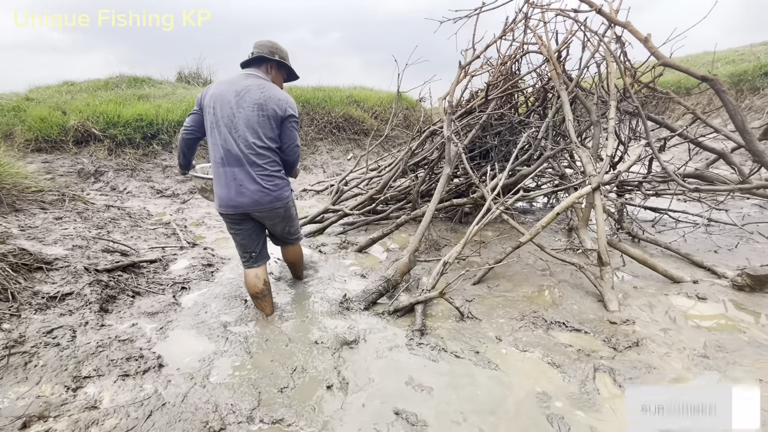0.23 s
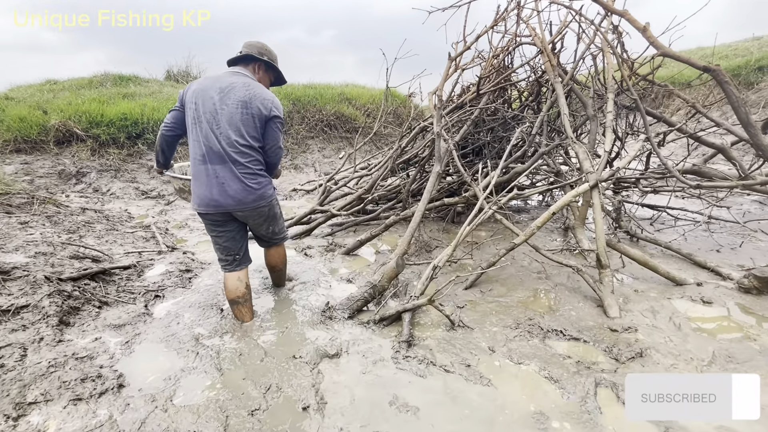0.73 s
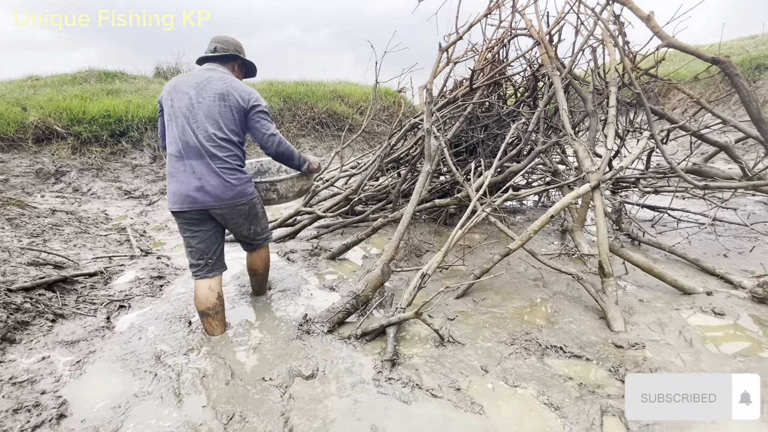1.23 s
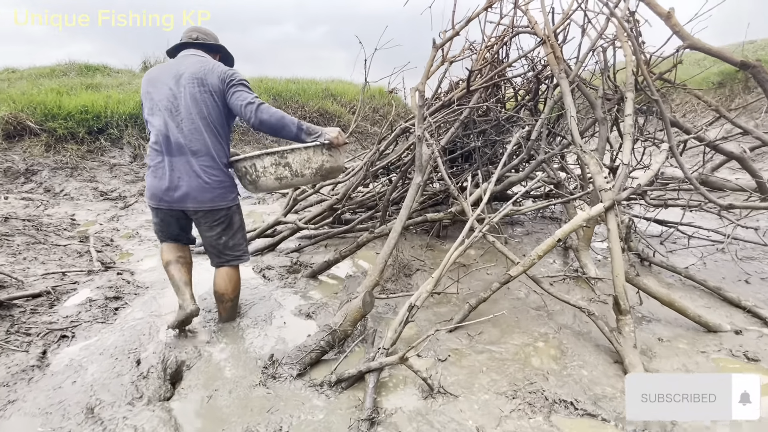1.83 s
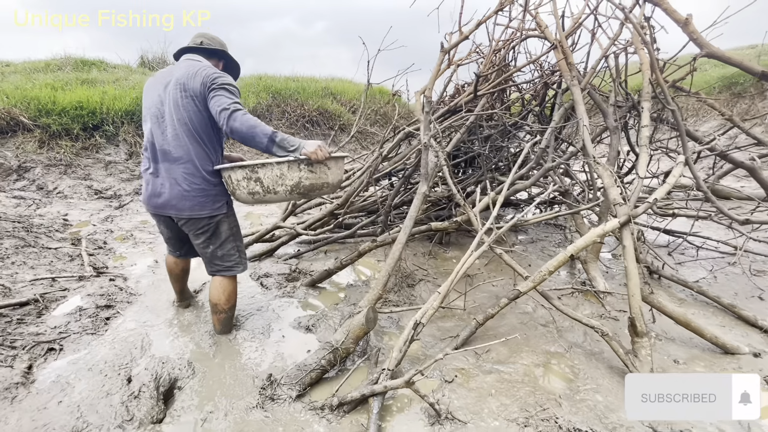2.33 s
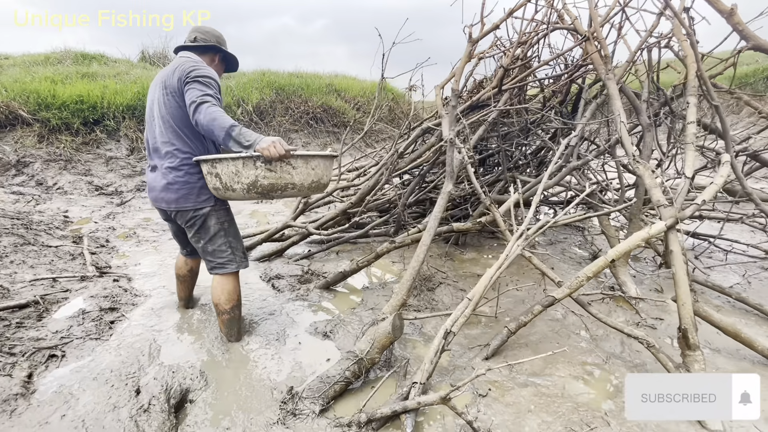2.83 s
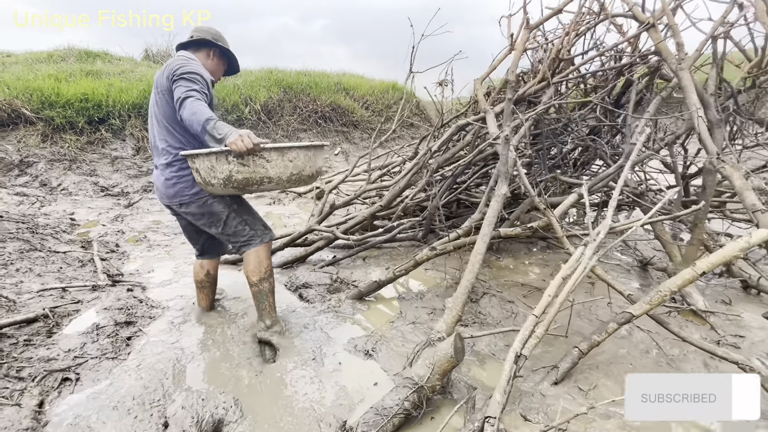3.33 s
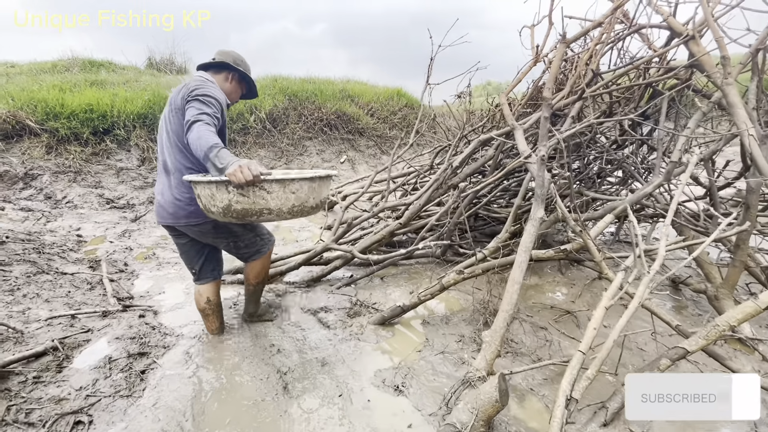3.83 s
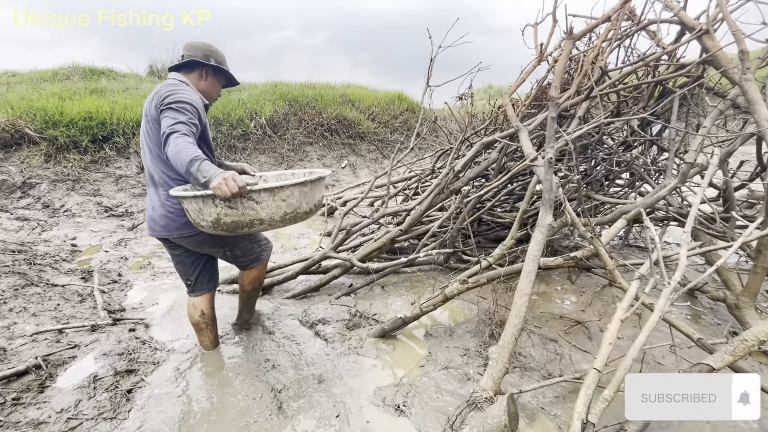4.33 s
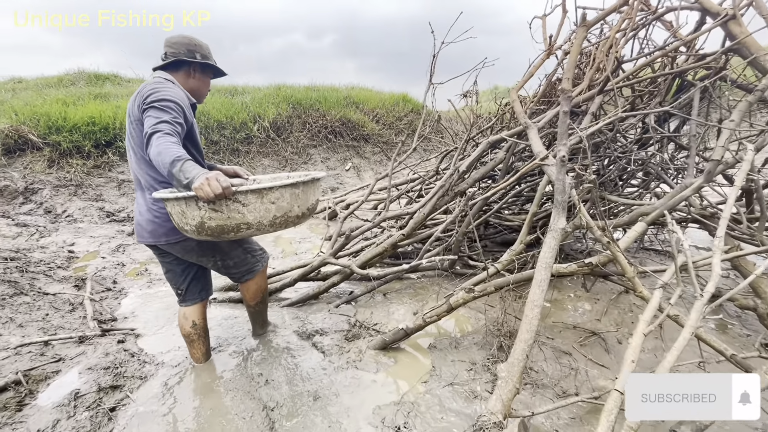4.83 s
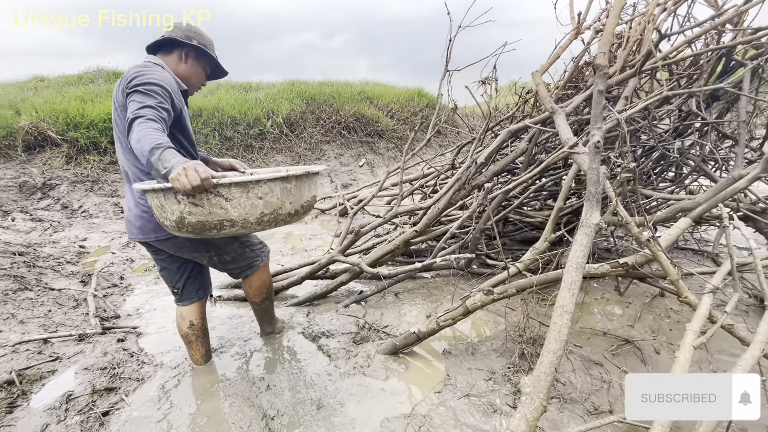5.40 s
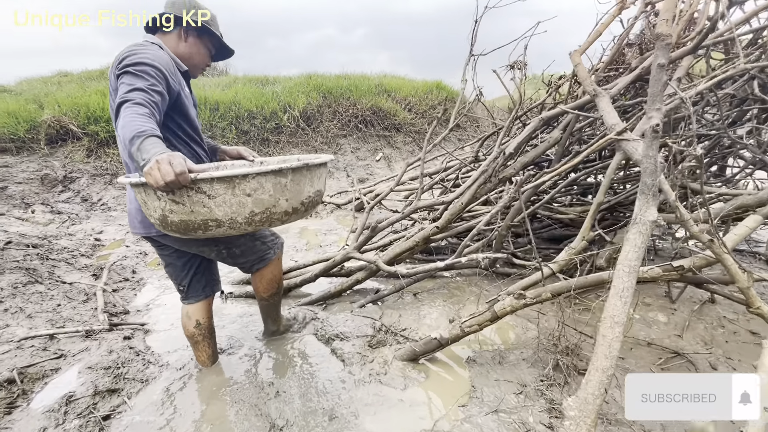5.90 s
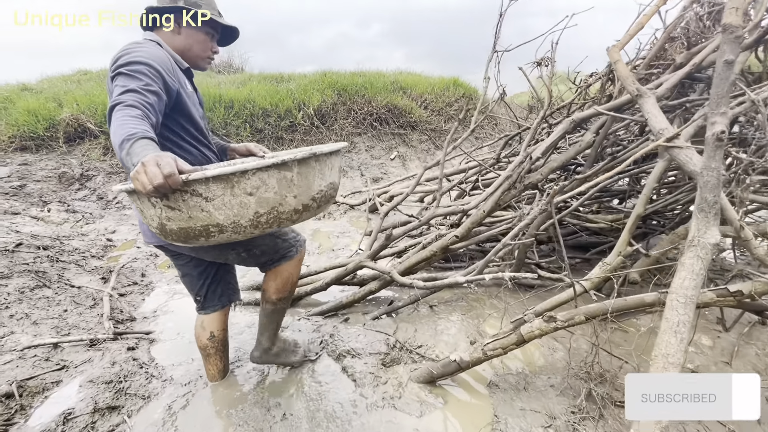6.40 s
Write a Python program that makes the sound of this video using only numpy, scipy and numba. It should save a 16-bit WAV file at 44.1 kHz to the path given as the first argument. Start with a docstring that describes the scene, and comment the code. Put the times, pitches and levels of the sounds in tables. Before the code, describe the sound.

Bare feet wade through wet mud, squelching, popping and splatting in uneven bursts, with fizzing water and a soft outdoor hiss.

```python
"""Bare feet wade through wet mud and puddles: air pockets pop as resonant bubbles with gliding, decaying tones.
Splats are showers of high-pitched droplets, thuds are low sagging notes, and gulps are gliding whistles.
Stirred water fizzes and gurgles as thousands of short bubble tones; grit scrapes ring a hollow body's few notes.
Filtered noise makes a soft outdoor hiss. All is heard close, in stereo, with level and time differences."""
import sys
import numpy as np
from scipy import signal
from scipy.fft import rfft, irfft, next_fast_len
from scipy.io import wavfile
from scipy.ndimage import uniform_filter1d
from numba import njit

SR = 44100
rng = np.random.default_rng(int(sys.argv[2]) if len(sys.argv) > 2 else 0)


def log_audio(samples):
    """Write samples as a 16-bit WAV file to the path given in sys.argv[1]."""
    # one column per channel
    frames = np.atleast_2d(samples).T
    # limit to full scale, then quantise
    limited = np.clip(frames, -1, 1)
    pcm = np.round(limited * 32767).astype(np.int16)
    wavfile.write(sys.argv[1], SR, pcm)


N = 293706


def undb(db):
    """Level to amplitude: 20 dB is a factor of ten."""
    return 10 ** (np.asarray(db) / 20)


def colour(x, points):
    """Linear filtering: weight the spectrum by (f/Hz, gain/dB) points joined along log frequency."""
    hz, db = np.transpose(points)
    size = next_fast_len(N)
    bins = np.maximum(np.fft.rfftfreq(size, 1 / SR), 1)
    gain = undb(np.interp(np.log(bins), np.log(hz), db))
    return irfft(rfft(x, size) * gain, size)[..., :N]


def walk(rate):
    """Slow random modulation: levels held 1 / rate s, then smoothed twice; spread near 1."""
    hold = int(SR / rate)
    steps = np.repeat(rng.standard_normal(N // hold + 1), hold)
    return 1.3 * uniform_filter1d(uniform_filter1d(steps, hold), hold)[:N]


@njit
def ring(s, hz, swell, fade, glide, left, right, lead, count, sr):
    """Transient resonance: gliding sines, 8 dB down swell s before and fade s after the peak; right lags by lead s."""
    out = np.zeros((2, count))
    for e in range(len(s)):
        for c in range(2):
            peak = (s[e] + c * lead[e]) * sr
            size = left[e] if c == 0 else right[e]
            first = max(int(peak - 2.2 * swell[e] * sr), 0)
            last = min(int(peak + 4 * fade[e] * sr), count)
            for i in range(first, last):
                t = (i - peak) / sr
                u = -t / swell[e] if t < 0 else t / fade[e]
                fall = u * u if t < 0 else u * np.sqrt(u)
                phase = 2 * np.pi * hz[e] * t * (1 + glide[e] * t / 2)
                out[c, i] += size * np.exp(-.92 * fall) * np.sin(phase)
    return out


def bubbles(s, db, hz, swell, fade, pan_db, octaves, lead_ms):
    """Bubble resonance: each air pocket rings, its pitch moving by about octaves over swell plus fade."""
    one = np.ones(len(s))
    glide = np.log(2) * octaves / (swell + fade)
    left, right = undb(db + pan_db / 2) * one, undb(db - pan_db / 2) * one
    return ring(s, hz, swell, fade, glide, left, right, lead_ms / 1000 * one, N, float(SR))


def droplets(s, db, centre_hz, pan_db, spread, turns, scatter_db, lead_ms, wander_ms, low_hz=40):
    """Superposition of tiny bubbles, random in pitch, level and place, fading 8 dB in turns cycles."""
    pitch, size, place, side = rng.standard_normal((len(s), 4)).T
    hz = np.clip(centre_hz * 2 ** (spread * pitch), low_hz, 15000)
    swell, fade, octaves = .4 * turns / hz, turns / hz, .06
    level_db = db + scatter_db * np.abs(size)
    return bubbles(s, level_db, hz, swell, fade, pan_db + 0.5 * side, octaves, lead_ms + wander_ms * place)


def shower(s, swell, fade, count):
    """Random arrivals round each peak: droplet times, and levels falling 7 dB per swell or fade time."""
    s, swell, fade = (np.repeat(c, count) for c in (s, swell, fade))
    where = 5.5 * rng.random(len(s)) - 1.5  # in swell times before the peak, fade times after it
    return s + where * np.where(where < 0, swell, fade), -7 * np.abs(where)


# chosen spectrum for the soft hiss, with almost nothing above 13 kHz: (f/Hz, relative level/dB)
HISS_SPECTRUM = [(30, -29), (70, 0), (250, -1.5), (550, 8.5), (3000, -10), (11500, -19.5), (13000, -43)]
HISS_DB = -74.5  # level before the swell and the overall tone


def air():
    """Partial coherence: a shared hiss plus independent noise in each channel, swelling a little."""
    shared, left, right = colour(rng.standard_normal((3, N)), HISS_SPECTRUM)
    hiss = np.array([left, right]) + 1.73 * shared
    swell_db = np.array([[1.5], [-1.5]]) + walk(3)
    return hiss * undb(HISS_DB + swell_db) / np.std(hiss)


# water draining and stirring round the legs, before each layer's share: (t/s, fizz level/dB, gurgle level/dB)
STIRRING = [(0.0, -36, -55.5), (0.12, -47, -59.5), (0.33, -44, -61.5), (0.48, -55, -73),
            (0.82, -57.5, -70.5), (1.01, -50, -62), (1.5, -49, -62.5), (1.56, -47, -39), (1.64, -35, -44),
            (1.68, -48, -56), (1.85, -45, -49.5), (2.2, -42.5, -59.5), (2.26, -33, -61), (2.42, -39.5, -52),
            (2.67, -55, -61.5), (3.15, -53, -71.5), (3.55, -43, -53), (3.65, -42, -51.5),
            (3.97, -38, -43.5), (4.09, -39.5, -49), (4.25, -48, -52), (4.47, -57, -87),
            (4.65, -52.5, -66.5), (4.76, -59, -77.5), (5.28, -55, -95), (5.67, -54.5, -72),
            (5.73, -47.5, -60.5), (5.95, -54.5, -57), (6.35, -47.5, -52.5), (6.49, -47, -59),
            (6.66, -45, -55)]
# pitch of the gurgle as the hollow round the leg opens and fills: (t/s, f/Hz)
GURGLE_PITCH = [(0, 659), (1.5, 532), (1.74, 540), (1.79, 770), (1.88, 940), (1.93, 648), (2.4, 750),
                (2.5, 1066), (2.7, 917), (3.2, 574), (3.953, 550), (4.031, 850), (4.5, 766), (5.7, 600),
                (6.0, 723), (6.66, 662)]
# wakes left by events: drive relative to the event in dB, time to fall 8.7 dB in s
FIZZ_WAKE_DB, FIZZ_WAKE_S = 3.5, 0.008
GURGLE_WAKE_DB, GURGLE_WAKE_S = -14.5, 0.012
WAKE_RISE_S = 0.0047


def slosh():
    """Entrained-air noise: fizz, crackle, plips, gurgle and dull rumble follow the stirring in uneven spurts."""
    _, fizz_db, slow_gurgle_db = np.transpose(STIRRING)
    sprays = [(s, db + 10 * np.log10(spread)) for s, db, _, _, spread in SPLAT_EVENTS]  # wide splats fizz more
    fizz_db = stirred(fizz_db, sprays, FIZZ_WAKE_DB, FIZZ_WAKE_S)
    gurgle_db = stirred(slow_gurgle_db, POP_EVENTS, GURGLE_WAKE_DB, GURGLE_WAKE_S)
    thud_wake_db = stirred(slow_gurgle_db, THUD_EVENTS, GURGLE_WAKE_DB, GURGLE_WAKE_S)
    both_db = (gurgle_db + fizz_db) / 2
    rumble_db = 0.52 * thud_wake_db  # flatter dynamics
    hollow_hz = np.interp(np.arange(N) / SR, *np.transpose(GURGLE_PITCH))
    fizz_turns, plip_turns, gurgle_turns = 6.5, 3., 5.
    # droplets, level/dB, centre f/Hz, spread/octaves, fade/cycles, size scatter/dB, share/dB
    layers = [
        (32000, fizz_db, 7805.0, 0.693, fizz_turns, 1.37, -19.5),  # fine fizz
        (300, both_db, 1940.0, 0.606, plip_turns, 1.4, -4.5),  # lone plips
        (400, fizz_db, 11670.0, 0.37, plip_turns, 2.7, -7.0),  # high plips
        (1500, gurgle_db, hollow_hz, 0.286, gurgle_turns, 1.5, -9.0),  # gurgle
        (3000, gurgle_db, 1.551 * hollow_hz, 0.413, gurgle_turns, 1.87, -6.5),  # upper gurgle
        (12000, both_db, 2456.0, 0.466, fizz_turns, 0.63, -16.5),  # crackle
        (1500, rumble_db, 220.0, 0.85, 0.99, 0.45, -35.5),  # dull rumble
    ]
    out = 0
    for count, curve_db, hz, spread, turns, scatter_db, share_db in layers:
        s = rng.random(count) * N / SR
        at = (s * SR).astype(int)
        db = (curve_db + 3 * walk(25))[at] + share_db
        centre_hz = (hz * np.ones(N))[at]
        out = out + droplets(s, db, centre_hz, 7.16, spread, turns, scatter_db, 0.4284, 0.12)
    return out


def stirred(curve_db, events, wake_db, wake_s):
    """Energy addition: slow stirring power plus each event's decaying wake, as a level in dB per sample."""
    t = np.arange(N) / SR
    kicks = np.zeros(N)
    s, db = np.transpose(events)[:2]
    np.add.at(kicks, ((s + WAKE_RISE_S / 2) * SR).astype(int), undb(db + wake_db) ** 2)
    drive = uniform_filter1d(kicks, int(WAKE_RISE_S * SR))
    wake = signal.lfilter([1], [1, -np.exp(-2 / (wake_s * SR))], drive)
    slow = undb(np.interp(t, np.transpose(STIRRING)[0], curve_db)) ** 2
    return 10 * np.log10(slow + wake)


# jerks of a gritty scrape on something hollow: (peak t/s, level/dB before the note levels)
SCRAPE_JERKS = [(5.016, -55), (5.05, -54), (5.358, -46), (5.381, -42), (5.701, -45), (5.723, -44),
                (5.75, -52)]
# the hollow's resonances: (f/Hz, relative level/dB)
HOLLOW_NOTES = [(2500, -18), (3450, 2), (4600, -19.5), (5350, -0.5), (6210, -5.5)]
JERK_SWELL_S, JERK_FADE_S = 0.0023, 0.0088  # 7 dB times


def scrapes(count=110):
    """Modal excitation: dense grit impacts set the hollow's few notes ringing."""
    s, db = np.transpose(SCRAPE_JERKS)
    late, under_db = shower(s, JERK_SWELL_S + 0 * s, JERK_FADE_S + 0 * s, count=count)
    notes = rng.integers(len(HOLLOW_NOTES), size=len(late))
    hz, note_db = np.array(HOLLOW_NOTES)[notes].T
    spread, turns = .07, 12.  # octaves, cycles
    grain_db = np.repeat(db, count) + under_db + note_db - 9
    return droplets(late, grain_db, hz, 8.1, spread, turns, 0.69, 0.51, 0.12)


# closing footprints squeeze their air:
# (t/s, length/s, start f/Hz, end f/Hz, level/dB before flutter, left minus right level/dB)
GULP_EVENTS = [(1.779, 0.032, 742, 990, -47, 1), (3.7, 0.15, 445, 695, -51.5, 10),
               (3.77, 0.053, 559, 400, -48, 7), (4.623, 0.04, 520, 900, -51.5, -6),
               (4.656, 0.026, 980, 1600, -54.5, -2), (5.943, 0.04, 797, 2200, -56.5, -5)]


def gulps():
    """Frequency modulation: a squeezed pocket whistles unsteadily and glides faster towards its end."""
    out = np.zeros((2, N))
    flutter = undb(3.2 * walk(130))
    for s, length, from_hz, to_hz, db, pan_db in GULP_EVENTS:
        part = np.linspace(0, 1, int(length * SR))
        hz = from_hz * (to_hz / from_hz) ** part ** 1.3
        tone = np.sin(2 * np.pi * np.cumsum(hz) / SR)
        shape = np.minimum(part / .06, 1) * np.minimum((1 - part) / .5, 1)
        sides = undb(db + np.array([[pan_db], [-pan_db]]) / 2)
        start = int(s * SR)
        out[:, start:start + len(part)] += sides * shape * tone
    return out * flutter


# soles and heels sinking into the mud: (peak t/s, peak level/dB, f/Hz)
THUD_EVENTS = [(0.151, -55, 57), (0.439, -52.5, 70), (0.742, -51, 104), (1.029, -52.5, 225),
               (1.248, -52, 63), (1.338, -51, 84), (1.553, -37, 98), (1.792, -47, 256), (3.22, -51, 89),
               (3.468, -32, 174), (3.487, -38, 95), (3.985, -45, 99), (5.129, -56, 272), (5.425, -40, 233),
               (5.61, -54, 253), (5.785, -35, 258), (5.971, -42, 246), (6.059, -45, 260),
               (6.118, -39.5, 216), (6.283, -38.5, 240), (6.413, -35, 233), (6.551, -33, 174),
               (6.571, -34, 92)]
THUD_CYCLES = 0.68  # from peak to 8 dB down
THUD_SAG = -.25  # octaves


def thuds():
    """Heavily damped resonance: the mud gives under the sole in a low note that sags."""
    s, db, hz = np.transpose(THUD_EVENTS)
    fade = THUD_CYCLES / hz
    return bubbles(s, db, hz, 1.28 * fade, fade, 4.1, THUD_SAG, 0.41)


# thrown water and mud: (peak t/s, nominal level/dB, centre f/Hz, 7 dB fade/ms, pitch spread/octaves)
SPLAT_EVENTS = [(0.019, -37, 8900, 11.2, 0.93), (0.258, -43, 5750, 5, 0.49),
                (0.3104, -33, 8140, 10.5, 0.53), (0.403, -46.5, 3970, 5.3, 1.05),
                (0.54, -52.5, 5360, 3.5, 1.15), (0.649, -49.5, 3000, 4.3, 0.65),
                (0.681, -45.5, 5400, 6.7, 0.17), (0.754, -48, 5960, 4, 0.17),
                (1.534, -35, 6130, 11.1, 0.44), (1.592, -29.5, 2620, 12.5, 0.071),
                (1.6108, -29.5, 4200, 3.5, 0.27), (1.626, -40, 6550, 21, 0.32),
                (1.7177, -35.5, 10000, 16.4, 0.5), (1.701, -43.5, 4970, 19, 0.5),
                (1.749, -34.5, 7350, 4, 0.45), (1.9113, -36, 7100, 25, 0.44),
                (1.9546, -28.5, 9400, 5.5, 1.32), (2.214, -17.5, 7170, 1.83, 0.12),
                (2.232, -25.5, 8200, 1.6, 0.27), (2.249, -30, 4500, 3, 1.15),
                (2.3906, -33.5, 10500, 7.7, 0.14), (2.426, -33, 9350, 5.1, 0.84),
                (2.607, -31.5, 7900, 2.7, 0.11), (2.727, -43, 4540, 1.6, 0.16),
                (2.74, -52.5, 4800, 1.4, 0.3), (2.8996, -39, 8650, 3.9, 0.13),
                (3.085, -36.5, 4500, 1.96, 0.24), (3.203, -43, 7950, 1.7, 0.58),
                (3.3172, -43, 3540, 4.8, 0.51), (3.447, -33.5, 3050, 7, 0.58),
                (3.4636, -29, 9900, 4.9, 0.92), (3.484, -27.5, 8440, 4.3, 0.6),
                (3.619, -36.5, 5800, 1.8, 0.38), (3.65, -27, 11100, 2.3, 0.14),
                (3.693, -34.5, 7800, 2, 0.47), (3.837, -27, 6730, 5.1, 0.13),
                (3.98, -16.5, 11300, 1.16, 0.25), (4.007, -31.5, 5740, 5.1, 0.59),
                (4.234, -37.5, 8640, 3.2, 0.2), (4.336, -40.5, 7250, 1.2, 0.25),
                (4.538, -45, 7530, 6.9, 0.31), (4.566, -41.5, 10760, 5.6, 0.23),
                (4.602, -27.5, 6050, 5.6, 0.11), (4.656, -40, 5320, 2.5, 0.083),
                (4.79, -42, 5180, 1.8, 0.1), (5.02, -51, 4290, 26.6, 0.52), (5.083, -38, 8850, 2.5, 0.12),
                (5.231, -44.5, 5500, 3.5, 0.067), (5.327, -53.5, 5850, 13.7, 0.79),
                (5.372, -46.5, 6550, 17.4, 0.8), (5.6046, -45.5, 5930, 4, 0.84),
                (5.701, -47.5, 6160, 13.4, 1.03), (5.75, -39.5, 6700, 4, 0.35),
                (5.805, -51, 5200, 4.4, 1.11), (5.994, -37.5, 6070, 0.81, 0.15),
                (5.78, -28.5, 9100, 3.2, 0.093), (6.1343, -47, 3460, 6.5, 1.08),
                (6.349, -41.5, 5400, 8.3, 0.77), (6.402, -33.5, 6400, 7.5, 0.78),
                (6.418, -32.5, 4900, 5.9, 0.13), (6.605, -22, 12740, 8.8, 0.11),
                (6.6193, -27.5, 2940, 2.4, 0.96)]
SPLAT_SWELL = 0.35  # swell time as a share of the fade


def splats(count=90):
    """Superposition of droplet impacts: each splat is a shower that swells, then dies away."""
    s, db, hz, fade_ms, spread = np.transpose(SPLAT_EVENTS)
    late, under_db = shower(s, SPLAT_SWELL * fade_ms / 1000, fade_ms / 1000, count=count)
    # a longer or wider shower spreads its droplets thinner, so each must be larger
    db = db + 10 * np.log10(fade_ms * spread / 2.93)
    db, hz, spread = (np.repeat(c, count) for c in (db, hz, spread))
    turns = 5.5  # cycles
    return droplets(late, db + under_db - 13.0, hz, 12.6, spread, turns, 0.16, 0.485, 0.03)


# air pockets bursting in the mud: (peak t/s, peak level/dB, f/Hz, 8 dB fade/ms)
POP_EVENTS = [(0.214, -46.5, 470, 2.5), (0.302, -45, 1750, 2), (0.31, -48, 2300, 3.7),
              (0.323, -49, 2370, 5.4), (0.4025, -44.5, 540, 1.2), (0.468, -48, 1580, 3.5),
              (0.618, -45, 400, 1.3), (0.715, -45, 490, 1.66), (1.4813, -42, 426, 1.45),
              (1.5264, -23.5, 1450, 3.4), (1.53, -31.5, 604, 7.4), (1.535, -26.5, 1350, 2.5),
              (1.554, -35, 945, 6.6), (1.571, -30.5, 576, 3.5), (1.5975, -25.5, 544, 2.6),
              (1.6115, -16, 990, 2.6), (1.619, -28.5, 1580, 11), (1.619, -16, 504, 5.7),
              (1.696, -25, 1610, 5.3), (1.702, -41, 2390, 3.8), (1.7127, -25.5, 1150, 3.7),
              (1.7241, -33.5, 574, 8.9), (1.7351, -36.5, 600, 4.9), (1.7782, -38, 714, 2.8),
              (1.811, -37, 880, 4.2), (1.8425, -38.5, 1060, 2.9), (1.851, -39, 880, 2.4),
              (1.866, -45, 990, 1.4), (1.874, -36, 890, 1.4), (1.9103, -25.5, 1740, 3.6),
              (1.913, -39.5, 627, 5), (1.956, -32.5, 2360, 1.1), (1.956, -26.5, 1426, 4.8),
              (1.978, -38, 2110, 3.5), (1.994, -39, 1930, 1.6), (2.233, -22.5, 1400, 0.58),
              (2.244, -39, 2640, 3.8), (2.309, -29, 2110, 0.59), (2.318, -43.5, 1190, 5.2),
              (2.461, -46, 1440, 0.63), (2.505, -31, 1510, 1.4), (2.476, -35, 1800, 1.03),
              (2.51, -40, 1910, 3.3), (2.5153, -41, 720, 3.5), (2.5262, -21.5, 1540, 1.66),
              (2.5631, -31, 1550, 2.3), (2.599, -64, 2450, 0.92), (2.6107, -41, 1860, 1.9),
              (2.62, -37, 2280, 0.32), (2.6344, -42, 1690, 1.3), (2.652, -49, 626, 2.3),
              (2.699, -46, 2450, 1.5), (2.711, -33.5, 1500, 1.7), (2.716, -32.5, 1700, 2.4),
              (2.728, -52, 905, 1.9), (2.7926, -39.5, 2400, 1.3), (2.901, -40.5, 2060, 1.33),
              (3.1806, -42, 1900, 0.52), (3.203, -26.5, 614, 2.44), (3.313, -41, 504, 5.7),
              (3.3651, -30.5, 1390, 2.8), (3.4475, -28, 544, 1.9), (3.4483, -36, 1700, 4.1),
              (3.4577, -30.5, 590, 3.5), (3.4638, -26.5, 1240, 2), (3.51, -37, 1180, 0.27),
              (3.58, -40.5, 1700, 3), (3.645, -39, 1200, 3.3), (3.657, -35, 1050, 2.8),
              (3.676, -42, 1090, 4), (3.685, -40, 1780, 2.5), (3.6529, -31.5, 470, 2.8),
              (3.662, -31.5, 1740, 2.2), (3.6947, -34.5, 1730, 1.6), (3.762, -43, 1110, 4.5),
              (3.799, -39.5, 468, 5.7), (3.8422, -39, 935, 8.4), (3.8798, -37.5, 564, 8.2),
              (3.881, -35.5, 1090, 4.2), (3.9727, -18, 1130, 0.74), (3.939, -39, 1050, 4),
              (3.9927, -26, 2240, 0.49), (4.012, -38.5, 1090, 11), (4.058, -39.5, 950, 5.1),
              (4.235, -43, 2720, 3), (5.219, -51, 1170, 2.3), (5.5222, -37, 2120, 5.6),
              (5.5321, -54, 640, 3.7), (5.651, -52.5, 1500, 2.9), (5.699, -43, 600, 5.9),
              (6.035, -42, 1670, 3.4), (6.086, -45, 3000, 9), (6.137, -35.5, 580, 3.44),
              (6.2203, -47, 620, 3), (6.283, -49, 2450, 5.3), (6.253, -39.5, 610, 3.2),
              (6.2946, -31.5, 615, 3.35), (6.306, -56, 1820, 1.7), (6.352, -51, 3330, 4.5),
              (6.384, -41, 2050, 4.5), (6.4, -33.5, 716, 2.7), (6.36, -37, 480, 4.1),
              (6.398, -36, 1560, 1.64), (6.481, -41.5, 490, 3.6), (6.533, -43, 610, 2.5),
              (6.5438, -23, 695, 1.14), (6.555, -37.5, 1500, 1.9), (6.5552, -33.5, 790, 2.9),
              (6.597, -30, 1450, 1.75), (6.6258, -28.5, 1210, 1.26)]
# where the working foot stands: (t/s, left minus right level/dB, left lead/ms)
FOOT_PLACE = [(0, 8.5, 0.39), (1.7, 6.5, 0.35), (1.8, -1, -0.054), (1.96, 4.5, 0.423), (2.25, 5.5, 0.091),
              (2.8, 3, 0.064), (3.198, 10.5, 0.36), (4.3, 3.5, 0.25), (5.699, 7.5, 0.216), (6.1, 6, 0.19),
              (6.36, 3.5, -0.27), (6.66, 3, 0.34)]
POP_RISE = 0.28  # octaves per kHz of pitch for quick pops: small pockets chirp more
POP_QUICK_MS = 2.2  # pockets that ring longer than this hold their pitch better


def pops(count=28):
    """Bubble resonance: each pocket rings once, rising as it opens; mud tearing round it adds small neighbours."""
    s, db, hz, fade_ms = np.transpose(POP_EVENTS)
    when, foot_db, foot_ms = np.transpose(FOOT_PLACE)
    pan_db, lead_ms = np.interp(s, when, foot_db), np.interp(s, when, foot_ms)
    fade = fade_ms / 1000
    rise = POP_RISE * hz / 1000 * np.minimum(POP_QUICK_MS / fade_ms, 1) ** 2
    pockets = bubbles(s, db, hz, 0.29 * fade, fade, pan_db, rise, lead_ms)
    late, under_db = shower(s, 0.932 * fade, 2.3 * fade, count=count)
    db_n, hz_n, pan_n, lead_n = (np.repeat(c, count) for c in (db, hz, pan_db, lead_ms))
    turns, scatter_db, spread, share_db = 2.6, 2.5, .36, -16.5
    tear_db = db_n + under_db + share_db
    tearing = droplets(late, tear_db, 1.071 * hz_n, pan_n, spread, turns, scatter_db, lead_n, 0.19, low_hz=447)
    return pockets + tearing


def scene():
    """Linear superposition of all sources, from background to main source."""
    return air() + slosh() + scrapes() + gulps() + thuds() + splats() + pops()


# tonal tilt between the channels: (f/Hz, left minus right level/dB)
STEREO_TILT = [(60, 0), (400, -1.5), (2500, -4.5), (3400, -2.5), (6700, -0.5), (8500, -3), (15000, -10.5)]
# overall tone, a bright rise to 11.5 kHz, then a steep drop above 12.6 kHz: (f/Hz, gain/dB)
OVERALL_TONE = [(30, 2), (100, -1.5), (11500, 9.5), (12600, 4), (13500, -41.5), (16000, -17.5)]
TOP_HZ = 15850  # low-pass edge


def record(dry):
    """Linear filtering: a left/right tilt, the overall tone and a steep low-pass."""
    tilt = np.array(STEREO_TILT)
    left = colour(dry[0], tilt * [1, .5])
    right = colour(dry[1], tilt * [1, -.5])
    wet = colour(np.array([left, right]), OVERALL_TONE)
    return signal.sosfilt(signal.ellip(10, .2, 80, TOP_HZ, fs=SR, output="sos"), wet)


dry = scene()
out = record(dry)
log_audio(out)
```